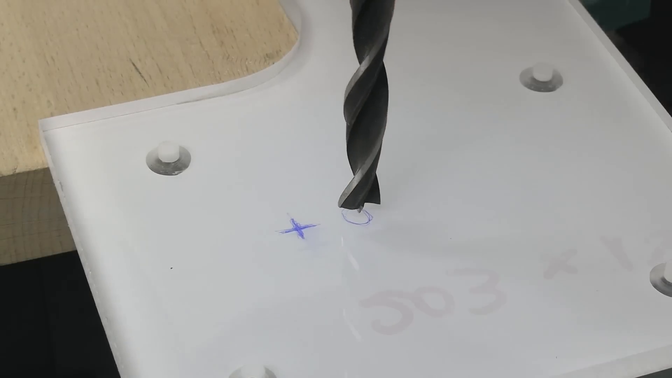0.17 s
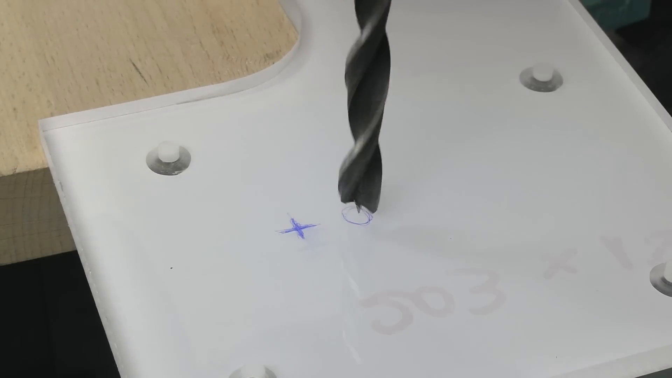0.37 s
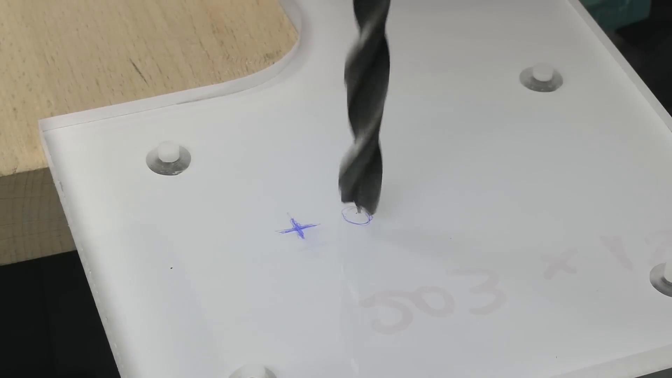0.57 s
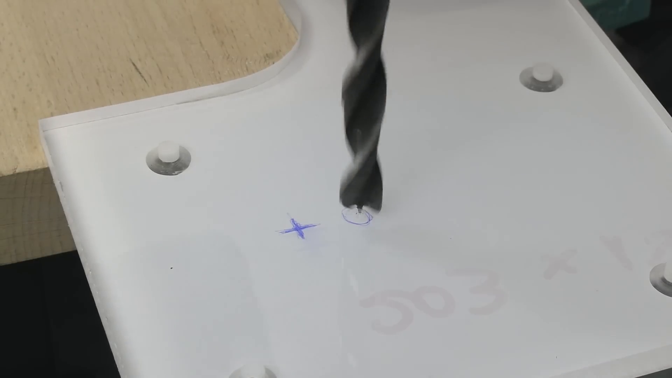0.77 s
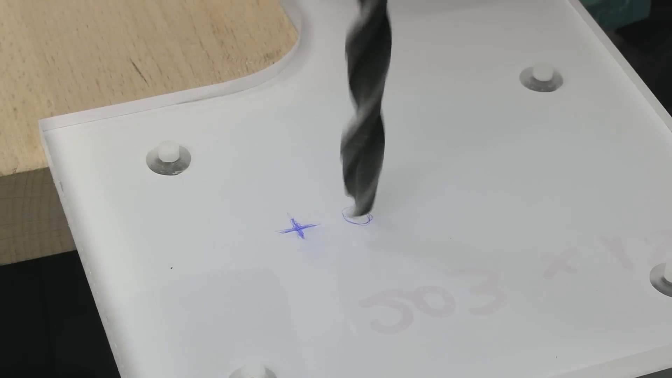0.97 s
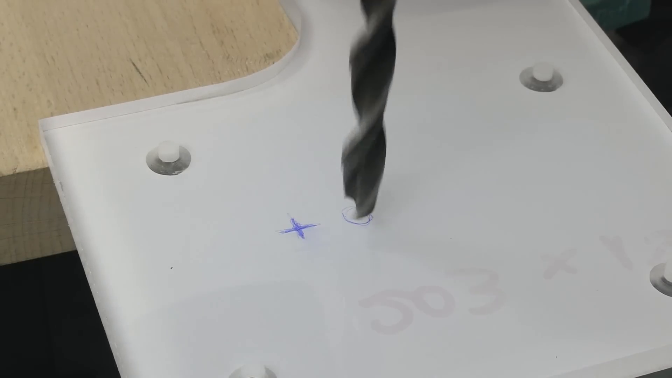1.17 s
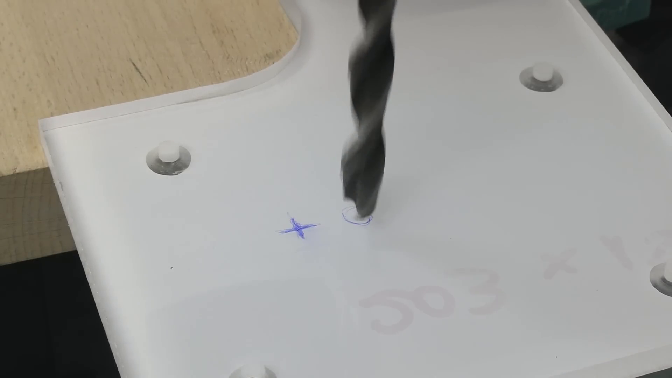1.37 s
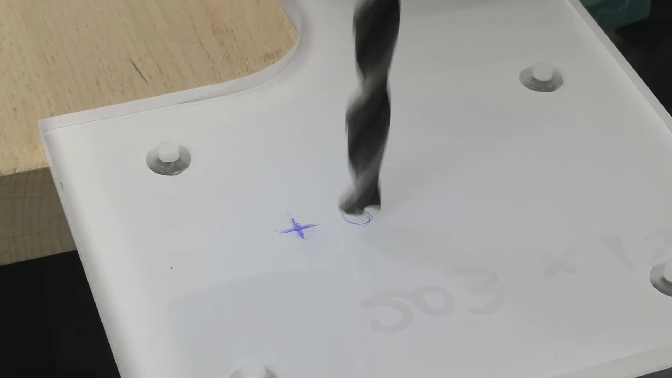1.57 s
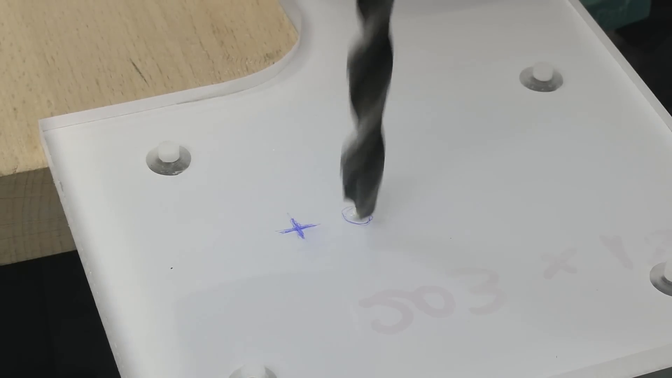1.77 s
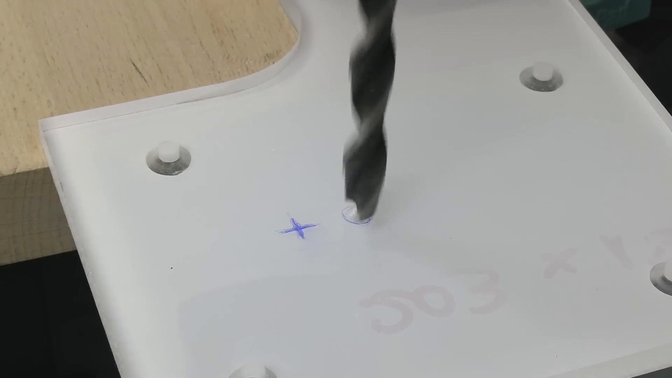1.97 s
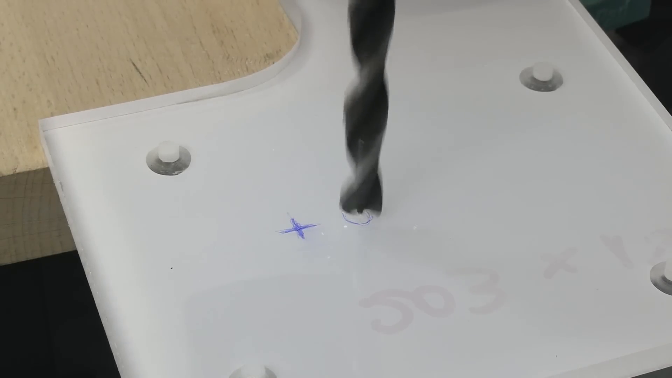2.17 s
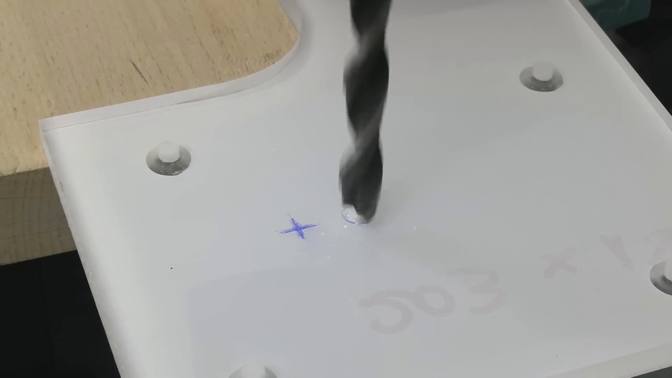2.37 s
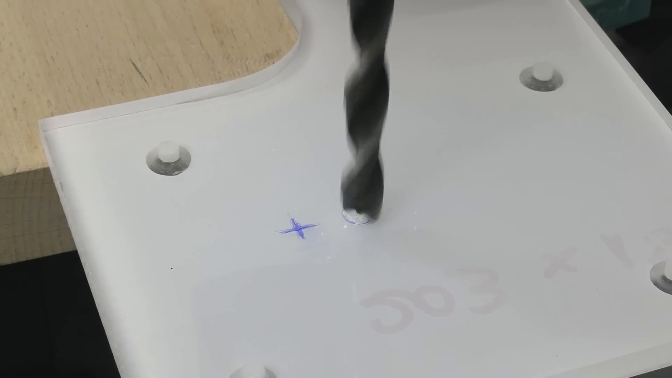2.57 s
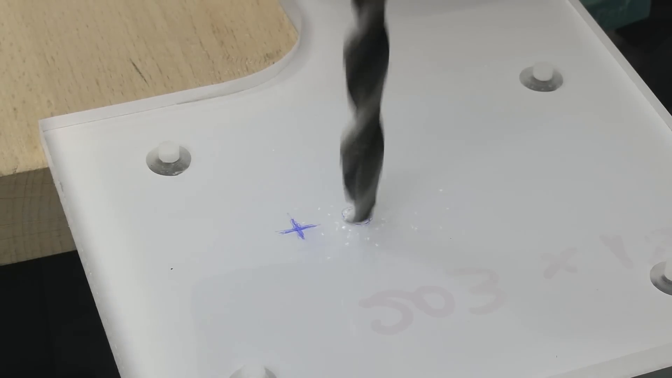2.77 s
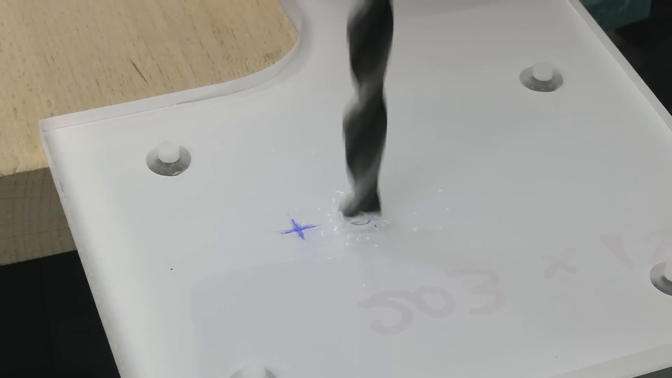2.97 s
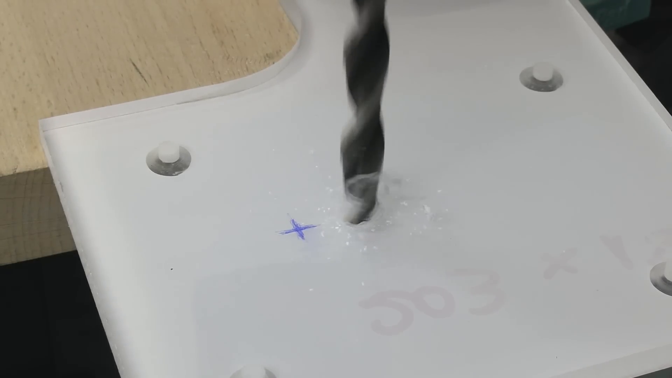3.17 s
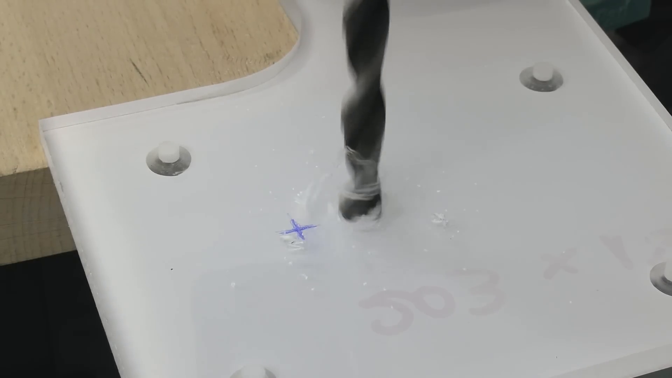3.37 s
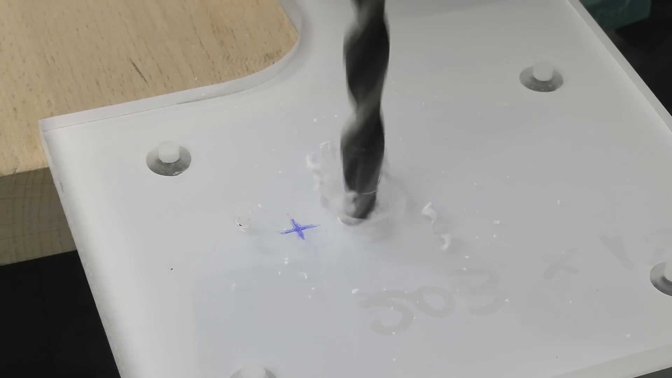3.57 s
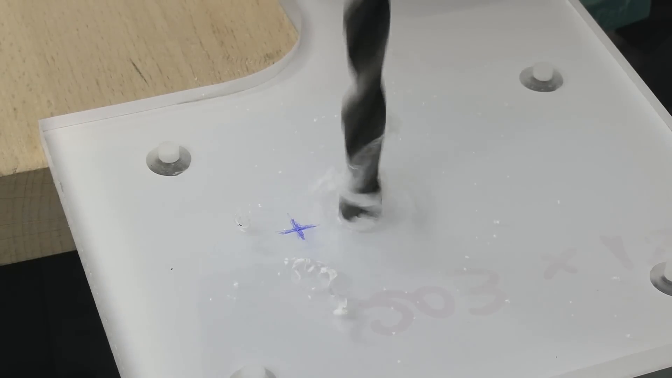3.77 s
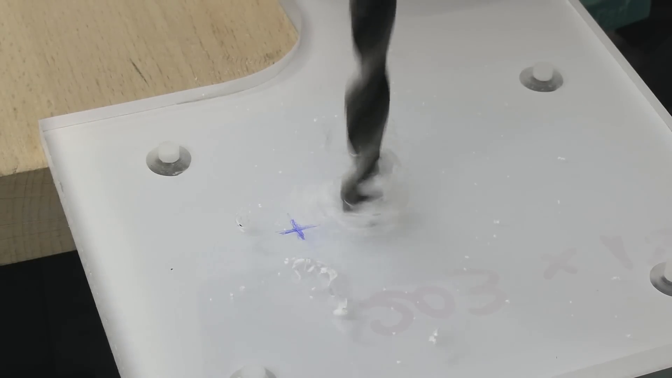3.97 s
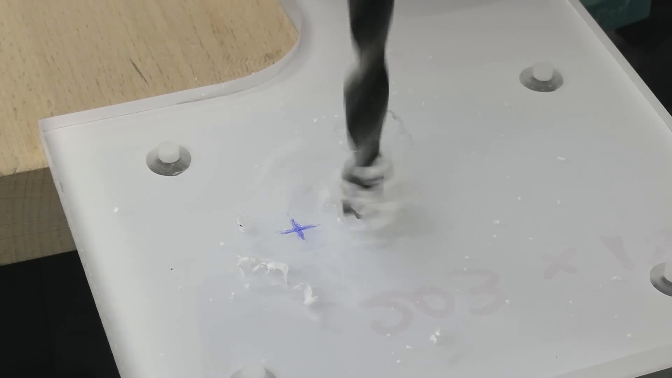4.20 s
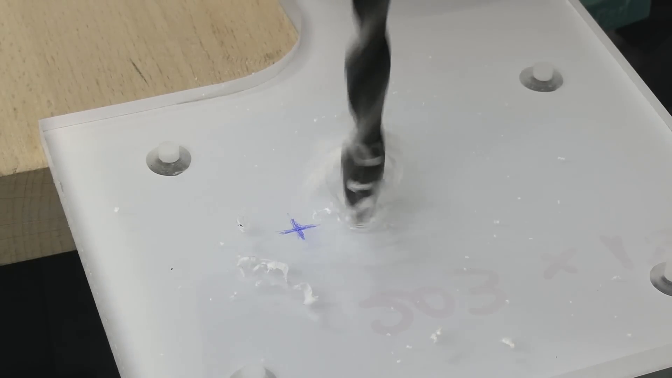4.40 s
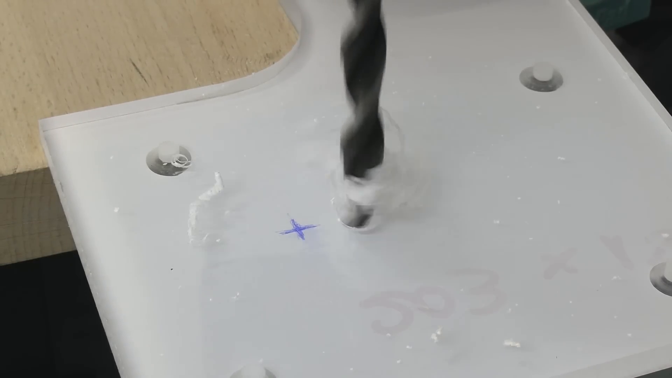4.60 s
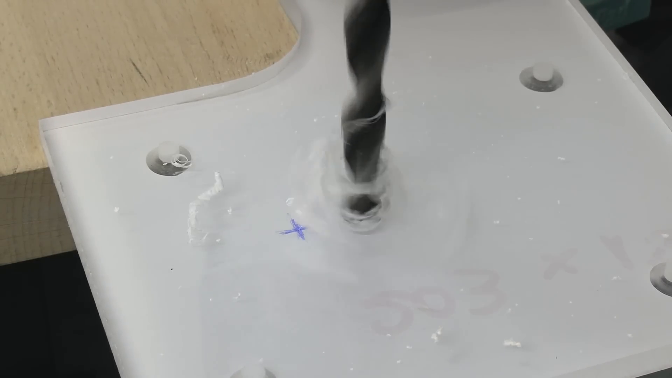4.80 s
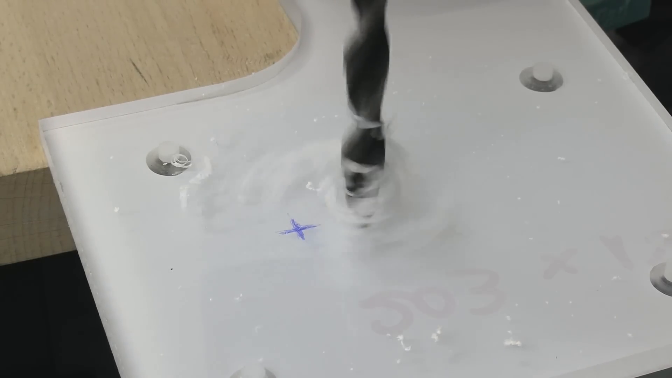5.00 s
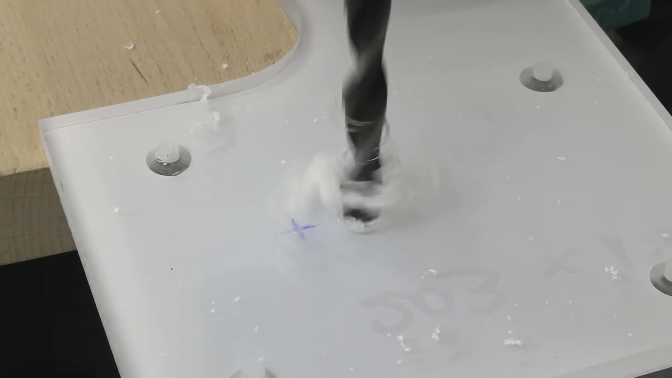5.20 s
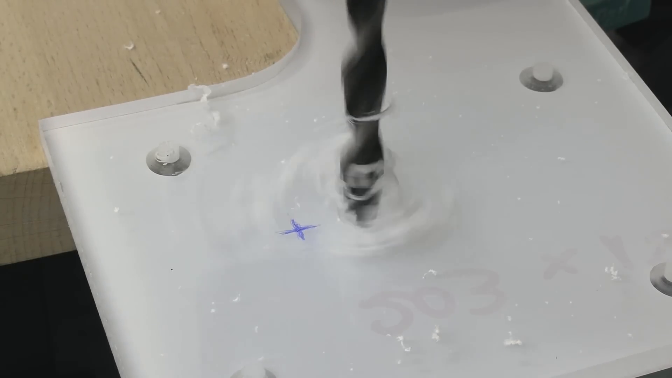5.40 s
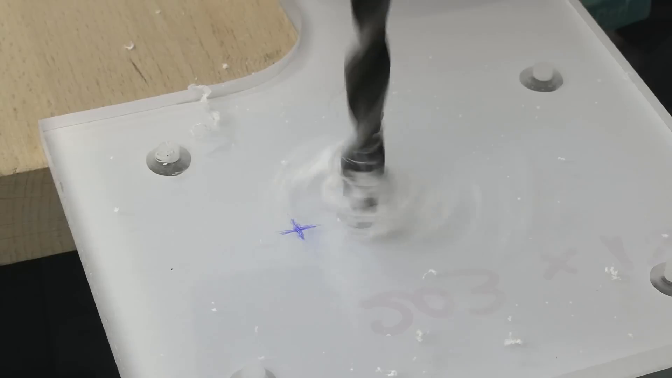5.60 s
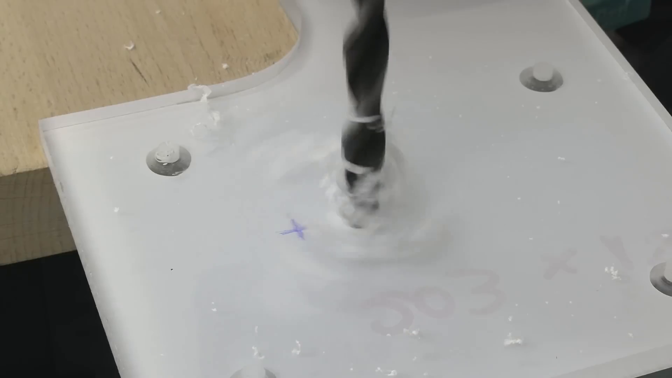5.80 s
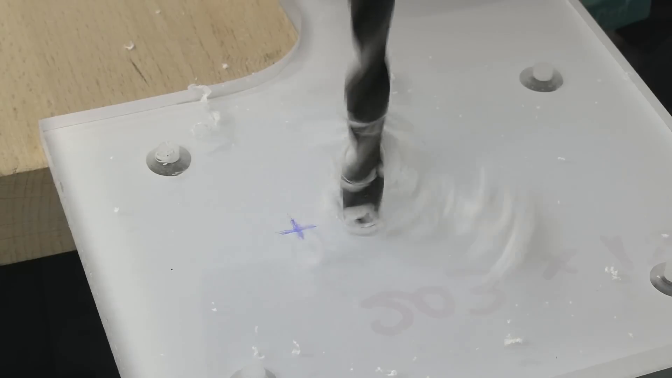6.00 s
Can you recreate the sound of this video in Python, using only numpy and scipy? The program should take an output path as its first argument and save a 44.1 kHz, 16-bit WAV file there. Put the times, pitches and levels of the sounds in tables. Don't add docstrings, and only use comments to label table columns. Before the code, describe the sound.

In a quiet workshop, a drill's trigger clicks and a dull knock starts the motor. Its whine climbs in uneven steps to a bright, hissy full speed with soft air puffs. Abruptly the sound is nearer; the bit bites plastic, short high squeaks chirp out, and the tone sags and growls with small bumps until the end. Close stereo microphone, little room.

```python
import sys
import numpy as np
from scipy import signal
from scipy.fft import rfft, irfft, next_fast_len
from scipy.io import wavfile
from scipy.ndimage import uniform_filter1d, map_coordinates

SR = 44100
rng = np.random.default_rng(int(sys.argv[2]) if len(sys.argv) > 2 else 0)


def level_to_linear(level):
    exponent = np.asarray(level, float) / 20
    return 10 ** exponent


def wav_out(sig):
    wavfile.write(sys.argv[1], SR, np.round(np.clip(np.atleast_2d(sig).T, -1, 1) * 32767).astype(np.int16))


N = 266805

ON_S, FREE_S = .412, .767
FULL_S, SCENE_S = 1.52, 2.075
BITE_S, HUM_S = 2.33, 2.765
POLES = 3


def unit(x):
    return x / np.sqrt(np.mean(x ** 2) + 1e-20)


def along(points, hz):
    f, v = np.transpose(points)
    return np.interp(np.log(hz + 1), np.log(f + 1), v)


def curves(rows):
    s, *cols = np.transpose(rows)
    t = np.arange(N) / SR
    gate = uniform_filter1d(1. * ((t > s[0]) & (t <= s[-1])), size=150)
    return [gate] + [np.interp(t, s, c) for c in cols]


def between(s0, s1):
    return curves([(s0,), (s1,)])[0]


def wobble(rate, size=N):
    coarse = np.arange(0, size + 8, 8)
    knots = rng.standard_normal(int(size * rate / SR) + 4)
    curve = map_coordinates(knots, [coarse * rate / SR])
    return np.interp(np.arange(size), coarse, curve)


def filtered(x, response):
    m = next_fast_len(N + 8192)
    return irfft(rfft(x, m) * response(np.fft.rfftfreq(m, 1 / SR)), m)[..., :N]


def rush(spectrum, wide, lumps):
    colour = lambda hz: level_to_linear(along(spectrum, hz) + [0 * hz, along(wide, hz)])
    mid, side = filtered(lumps * rng.standard_normal((2, N)), colour)
    return unit(np.array([mid + side, mid - side]))


def add(x, s, sound):
    part = x[round(s * SR):][:len(sound)]
    part += sound[:len(part)]


def drill():
    t, (speed, deep) = np.arange(N) / SR, shaft()
    return starting(t, speed) + running(speed) + boring(t, speed, deep)


# (time [s], shaft speed aimed at [turns/s], lag [s])
STEPS = [(.405, 84, .034), (.5, 87.6, .068), (.607, 110, .05), (.625, 154, .052), (.764, 155.5, .003),
         (.772, 183.6, .115), (1.296, 205, .05), (1.318, 235.3, .031), (1.455, 256.1, .02),
         (2.09, 255.3, .1), (2.311, 265.6, .014)]
# (time [s], speed lost [turns/s])
SAG = [
    (2.6, 0),
    (2.9, .8),
    (3.32, 2.9),
    (4, 3.6),
    (4.28, 4.5),
    (4.52, 4.1),
    (5.24, 6),
    (5.72, 7.1),
    (6.05, 6.1),
]


def shaft():
    t, speed = np.arange(N) / SR, np.zeros(N)
    for s, aim, lag in STEPS:
        climb = aim + (speed[int(s * SR)] - aim) * np.exp(-np.abs(t - s) / lag)
        speed = np.where(t >= s, climb, speed)
    sag = curves(SAG)[1]
    nearly_full_sag = 4.5
    return uniform_filter1d(speed, size=300) - sag, np.tanh(sag / nearly_full_sag)


def poled(order):
    return POLES * round(order / POLES)


def whine(gate, speed, levels, casing, drift_hz, flutter_db, smear, skew, surge_db=0, flutter_hz=35):
    on = gate > 0
    surge = np.tanh(np.abs(np.gradient(speed)) * SR / 700)[on]
    speed = (speed + drift_hz * wobble(13))[on]
    turns, out = np.cumsum(speed) / SR, np.zeros((2, N))
    for order, db in levels:
        lift_db = sum(g / (1 + (2 * (order * speed - hz) / w) ** 2) for hz, w, g in casing)
        phase = 2 * np.pi * order * turns + smear * np.sqrt(order) * wobble(70, size=len(turns))
        blur_db = surge_db * surge * (order > 10)
        flutter = flutter_db * wobble(flutter_hz, size=len(turns))
        level_db = (db + np.zeros(N))[on] + lift_db - blur_db + flutter
        size = np.sqrt(2) * gate[on] * level_to_linear(level_db)
        out[:, on] = out[:, on] + size * np.sin(phase + np.array([[-skew], [skew]]) * order)
    return out


def brushes(gate, hiss_db, casing_db, top_db, spectrum, wide, ripple, sparks_db):
    beat = np.cos(2 * np.pi * 310 * np.arange(N) / SR + 3.5 * wobble(16))
    lumps = (1 + ripple * beat) * level_to_linear(sparks_db * wobble(900) + 0.51 * wobble(12))
    hiss = rush(spectrum, wide, lumps)
    low_pass = lambda hz: 1 / (1 + (hz / 2800) ** 4)
    high_pass = lambda hz: 1 - 1 / (1 + (hz / 11500) ** 6)
    casing, top = filtered(hiss, lambda hz: np.array([[low_pass(hz)], [high_pass(hz)]]))
    return gate * level_to_linear(hiss_db) * (hiss + (level_to_linear(casing_db) - 1) * casing + (level_to_linear(top_db) - 1) * top)


# (shaft order, level when slow [dB], level when fast [dB])
START_ORDERS = [(3, -97, -71.5), (5.9, -85, -61), (8.99, -53, -35.5), (12.26, -86, -58.5),
                (17.8, -53.5, -44), (27, -53, -49.5), (30, -73, -56), (36.1, -66, -52), (45, -81, -49),
                (52.4, -65, -49), (63, -58, -54), (72, -67.5, -43), (80.5, -65, -58), (90, -66, -55)]
# (frequency [Hz], width [Hz], lift [dB])
START_CASING = [(567, 88, -10), (1280, 280, -4), (1380, 100, 3.5), (1800, 150, 9.5), (2000, 200, -5),
                (2260, 75, 6), (2680, 180, 6.5), (3770, 650, 14.5)]
# (frequency [Hz], density [dB per Hz])
START_HISS = [(180, -51), (300, -50), (600, -16.5), (1000, -8), (2200, -2.5), (4700, 2), (6000, -3),
              (7200, -5), (10200, -2), (15700, -11.5)]
# (frequency [Hz], side minus mid [dB])
WIDE_FREE = [(60, -26), (130, -11), (290, -25), (640, -26), (1000, -25), (1410, -34), (3100, -8.5),
             (6820, -10), (15000, -16)]


def starting(t, speed):
    fast = np.clip((speed - 80) / 68, -1.2, 1.05)
    levels = [(poled(order), slow_db + (fast_db - slow_db) * fast)
              for order, slow_db, fast_db in START_ORDERS]
    on = between(ON_S, FREE_S)
    fade_in = np.clip((t - .43) / .035, 0, 1)
    tones = whine(on * fade_in, speed, levels, START_CASING, drift_hz=0.072, flutter_db=3.5,
                  smear=0.024, skew=0.0071, surge_db=6.5)
    shudder_db = 0.62 + 8 * np.exp(-np.abs(t - ON_S) / 0.052)
    return tones + brushes(on, -43.5 + 8.4 * fast, shudder_db, -.5 - .5 * fast, START_HISS, WIDE_FREE,
                           ripple=0.039, sparks_db=0.8)


# (shaft order, level when slow [dB], level when fast [dB], gain at held speed [dB])
FREE_ORDERS = [(3, -63, -62, -11), (6, -57.5, -65, -2), (9, -49, -47, 5), (12, -50, -61, -5),
               (18, -61, -65, 0), (27, -53, -52, 0), (36, -45, -43, 1), (45, -60, -46, 2),
               (54, -45.5, -49.5, 0), (60, -56, -55, 2), (63, -55, -64, 0), (72, -50, -78, 0),
               (84, -53, -78, 0)]
# (shaft order, level [dB])
SPIN_FAINT = [(15, -60), (69, -66), (81, -64), (90, -56)]
# (frequency [Hz], width [Hz], lift [dB])
FREE_CASING = [(1434, 120, 10), (1890, 130, 6), (2060, 260, -15), (4580, 410, 11), (5450, 440, -2),
               (2730, 470, 8), (6340, 180, -14), (7900, 860, 9.5), (8300, 480, -20), (9400, 290, 8),
               (10400, 300, 4.5), (11800, 540, -12), (12550, 200, 4)]
# (frequency [Hz], density [dB per Hz])
FREE_HISS = [(180, -56), (300, -40), (432, -40), (746, -17), (910, -17.5), (1330, -13.5), (1820, -5.5),
             (3050, -7), (4310, -1), (5260, -6), (6210, -1.5), (7210, -7), (11100, -4.5), (14700, -11),
             (15700, -7)]
# (time [s], level [dB])
EFFORT = [
    (.767, -1.5),
    (.95, 1.3),
    (1.28, -2),
    (1.34, 0),
    (1.5, 1.5),
    (1.7, 1),
    (2.075, 0.5),
]


def running(speed):
    on, effort_db = between(FREE_S, SCENE_S), curves(EFFORT)[1]
    fast = np.clip((speed - 182) / 72, 0, 1)
    held = np.clip((np.arange(N) / SR - FULL_S) / (SCENE_S - FULL_S), 0, 1)
    levels = [(poled(order), slow_db + (fast_db - slow_db) * fast + 1.14 * effort_db + held_db * held)
              for order, slow_db, fast_db, held_db in FREE_ORDERS]
    faint = [(poled(order), db) for order, db in SPIN_FAINT]
    tones = whine(on, speed, levels, FREE_CASING, drift_hz=0.1, flutter_db=0.64,
                  smear=0.025, skew=0.0064, surge_db=-2.5)
    tones += whine(on, speed, faint, [], drift_hz=0.085, flutter_db=6.5, smear=0.044, skew=0.0036)
    fan_db = -3.5 + 3.7 * np.clip((speed - 155) / 100, 0, 1)
    return tones + brushes(on, -34.0 + effort_db, .1, fan_db, FREE_HISS, WIDE_FREE,
                           ripple=0.044, sparks_db=0.1)


# (shaft order, level shallow [dB], level deep [dB], gain before the bite [dB])
BORE_ORDERS = [(2.995, -76.5, -67, 9), (6, -54, -46, -15), (9, -67, -69, 1.5), (12, -59.5, -58.5, -2),
               (18, -46.5, -45, 3), (24, -54.5, -58.5, -4), (30, -54, -76, 1), (36, -52.5, -49.5, -2),
               (54, -50, -66, -8), (60, -57, -48, -4)]
# (shaft order, level shallow [dB], level deep [dB])
GEARS = [(5.07, -76, -61.5), (14, -59, -55), (16.4, -64, -51), (16.8, -56, -47.5), (33.6, -54, -54),
         (37.9, -58, -62), (49.4, -53, -53), (52.1, -64, -53), (56, -60, -48)]
# (frequency [Hz], density [dB per Hz])
LOADED_HISS = [(180, -72), (300, -31), (900, -27), (1400, -14), (1700, -11), (1830, -15), (1960, -12.5),
               (2150, -11), (2950, -10), (3500, -2.5), (4100, -2.5), (4360, 2.5), (4600, -4), (5010, -4.5),
               (8650, 1.5), (9050, -0.5), (9400, 1.5), (9800, -3), (10400, -2.5), (12000, 1), (15700, -2.5)]
# (frequency [Hz], side minus mid [dB])
WIDE_LOADED = [(60, -26), (130, -16), (290, -16), (640, -33), (1410, -31), (3100, -23), (6820, -8),
               (15000, -10)]


def boring(t, speed, deep):
    on, cut = between(SCENE_S, 7), deep ** 1.6
    loose = 1 / (1 + np.exp(np.clip((t - BITE_S) / 0.051, -30, 30)))
    no_hum = 1 - between(HUM_S, 7)
    motor = [(poled(order), a_db + (b_db - a_db) * cut + c_db * loose - 16 * (order < POLES + 1) * no_hum)
             for order, a_db, b_db, c_db in BORE_ORDERS]
    gears = [(order, a_db + (b_db - a_db) * cut) for order, a_db, b_db in GEARS]
    tones = whine(on, speed, motor, [], drift_hz=0.268, flutter_db=1.38, smear=0.12, skew=0.0041,
                  flutter_hz=74.7)
    tones += whine(on, speed, gears, [], drift_hz=0.287, flutter_db=2.0, smear=0.17, skew=0.0037)
    since_grab = t - 3.295
    throb_db = 1.2 * np.cos(2 * np.pi * 13 * since_grab) * np.exp(-(since_grab / .3) ** 2)
    return tones + brushes(on, -35.3 + 3.58 * deep + throb_db, -1.6 + 3.2 * deep, .1,
                           LOADED_HISS, WIDE_LOADED, ripple=0.058, sparks_db=0.4)


# (time [s], peak level [dB], frequency [Hz], length [s])
SQUEAKS = [(3.031, -31.5, 10200, 0.0064), (3.034, -33, 9300, 0.0082), (3.082, -33, 9600, .005),
           (3.085, -31, 9300, 0.0051), (3.088, -31, 10200, 0.0056), (3.131, -30, 9900, 0.0055),
           (3.14, -27, 9400, 0.0077), (3.166, -36, 10400, .008), (3.206, -30.5, 9700, 0.0104),
           (3.216, -28, 9400, 0.0034), (3.281, -29, 9620, 0.015), (3.293, -33, 10300, 0.015),
           (3.313, -31, 10300, 0.009), (3.355, -32.5, 9600, 0.016), (3.369, -36, 10300, .01),
           (3.377, -31, 10400, .007), (3.457, -36, 10400, 0.011), (3.495, -35, 10000, 0.0084),
           (3.512, -35, 9400, 0.0146), (3.596, -33, 10400, 0.0091), (3.601, -32.5, 9700, 0.01),
           (3.892, -36, 6400, 0.017), (4.046, -34.5, 6300, 0.017), (4.204, -37, 5570, 0.0097),
           (4.311, -35, 8800, 0.0087), (4.346, -33.5, 7000, 0.011), (4.374, -38, 6600, .01)]


def squeaks():
    x = np.zeros(N)
    for s, db, hz, length in SQUEAKS:
        u = np.arange(int(length * SR)) / (length * SR)
        band = signal.butter(2, [0.95 * hz, 1.08 * hz], "bandpass", fs=SR, output="sos")
        scrape = signal.sosfilt(band, rng.standard_normal(len(u)))
        chirp = np.sin(2 * np.pi * hz * length * (1.06 * u - 0.059 * u ** 2))
        add(x, s, level_to_linear(db) * np.sin(np.pi * u) * (0.87 * chirp + 2.46 * scrape))
    return x


# (time [s], peak level [dB], brightness [dB])
TICKS = [(0.01, -22, -7), (0.193, -42.5, -17), (0.2194, -53, -20), (0.2314, -64, -9), (0.2525, -45.5, -14),
         (0.27, -45, -23), (0.293, -52, -20), (0.3124, -54, -19), (0.321, -55, -20), (0.3665, -51, -10),
         (0.4037, -42, -8), (0.4118, -40, -1)]
# (frequency [Hz], level [dB], t60 [s])
SHELL = [(2160, -2.5, 0.0017), (2780, 3.5, 0.0037), (3480, -7, 0.0025), (5600, 12.5, 0.0035),
         (8800, 9, 0.0024), (11900, 10, 0.002)]


def ticks():
    x, t = np.zeros(N), np.arange(600) / SR
    for s, db, bright_db in TICKS:
        for hz, level_db, t60 in SHELL:
            strength_db = db - 6 + level_db + (hz > 4500) * bright_db + rng.normal(0, 2.1)
            ring = level_to_linear(strength_db - 60 * t / t60) * np.sin(2 * np.pi * hz * t)
            add(x, s, ring * (1 - np.exp(-t / 0.000096)))
    return filtered(x, lambda hz: 1 / (1 + (1100 / (hz + 1)) ** 3))


# (time [s], level [dB], t60 [s], upper modes [dB])
KNOCKS = [
    (.0105, -27, 0.1, -13),
    (0.4126, -18, 0.022, -8),
    (0.798, 4.5, 0.022, 1),
    (.81, -5, 0.057, -10),
]


def knock():
    x, t = np.zeros(N), np.arange(4000) / SR
    body = [(330, -47), (560, -42), (690, -34.5), (860, -35.5), (1020, -45), (1250, -42), (1900, -32.5)]
    for s, level_db, t60, upper_db in KNOCKS:
        ring = sum(level_to_linear(db + (hz > 1500) * upper_db) * np.sin(2 * np.pi * hz * rng.normal(1, .03) * t)
                   for hz, db in body)
        add(x, s, ring * level_to_linear(level_db - 60 * t / t60) * (1 - np.exp(-t / 0.0012)))
    return filtered(x, lambda hz: 1 / (1 + (330 / (hz + 1)) ** 6))


# (time [s], peak level [dB], frequency [Hz])
PUFFS = [(1.379, -56, 258), (1.422, -54, 291), (1.456, -64, 700), (1.493, -52, 328), (1.54, -55, 247),
         (1.61, -53, 337), (1.643, -55, 404), (1.779, -56, 326), (1.877, -49, 350), (2.044, -51.5, 417),
         (1.027, -66, 200), (1.114, -59, 245),
         (2.095, -51, 474), (2.227, -58, 748), (2.252, -55, 525), (2.313, -57, 528), (2.34, -57, 460),
         (2.449, -61, 396), (2.554, -59, 538), (2.64, -66, 390), (2.724, -55, 444), (2.756, -56.5, 624),
         (2.827, -64, 560), (3.003, -59, 409), (3.068, -65, 468), (3.168, -76, 748), (3.176, -66, 533),
         (3.33, -69, 342), (3.441, -71, 748), (3.527, -68, 501), (3.562, -75, 600), (3.758, -62, 393),
         (3.905, -55, 630), (4.069, -57, 622), (4.112, -54, 552), (4.145, -62, 506), (4.219, -49, 732),
         (4.27, -62, 748), (4.3, -58, 406), (4.33, -64, 541), (4.378, -72, 748), (4.4, -74, 576),
         (4.497, -66, 304), (4.625, -72, 748), (4.691, -59, 546), (4.732, -54.5, 479), (4.769, -64, 557),
         (4.851, -65, 748), (5.006, -51.5, 482), (5.085, -48.5, 594), (5.129, -61, 614), (5.171, -64, 355),
         (5.275, -61, 557), (5.436, -58, 525), (5.484, -56, 665), (5.635, -45.5, 549), (5.717, -56, 404),
         (5.789, -62, 514), (5.836, -63, 748), (5.88, -67, 627), (5.913, -50, 450), (5.945, -58, 345)]


def puffs():
    x = np.zeros((2, N))
    turn, lean = .7, .2
    for s, db, hz in PUFFS:
        cycles = np.arange(int(2.6 * SR / hz)) * hz / SR
        size = level_to_linear(db + 2.0) * np.sin(np.pi * cycles / 2.6) ** 2
        push = size * np.sin(2 * np.pi * cycles)
        late = size * np.cos(2 * np.pi * cycles)
        add(x[0], s, push * (1 + lean) + turn * late)
        add(x[1], s, push * (1 - lean) - turn * late)
    return x


# (time [s], level [dB])
GUSTS = [(.42, -90), (.9, -74.5), (1.1, -71), (1.27, -68), (1.4, -60), (2.08, -60.5), (2.15, -65),
         (2.3, -75), (2.5, -76), (2.8, -77.5), (3.5, -86), (4.3, -79), (6.05, -76)]
# (frequency [Hz], density [dB per Hz])
AIR = [(25, -17), (60, -16), (120, -8), (250, 0.5), (500, -5.5), (800, -5), (1200, -24.5)]
# (frequency [Hz], side minus mid [dB])
WIDE_AIR = [(60, -30), (90, -26), (140, -14), (250, -16), (500, -23), (900, -13)]


def air():
    gate, gust_db = curves(GUSTS)
    lumps = level_to_linear(3.0 * wobble(45) + 3.7 * wobble(15) + 0.78 * wobble(2.53))
    return gate * level_to_linear(gust_db) * rush(AIR, WIDE_AIR, lumps)


# (frequency [Hz], t60 [s])
SHOP = [(300, 0.11), (3000, 0.2), (12000, 0.13)]


def shop(x):
    hz, t, z = signal.stft(rng.standard_normal((2, SR // 3)), SR, nperseg=256)
    decay = level_to_linear(-60 * t / along(SHOP, hz)[:, None])
    tail = signal.istft(z * decay, SR, nperseg=256)[1]
    return signal.fftconvolve(x[None], tail / np.linalg.norm(tail[0]), axes=1)[:, :N]


# (frequency [Hz], density [dB per Hz])
QUIET = [(25, -24), (100, -17), (160, -17), (400, -12), (635, -9), (2020, -11), (2800, -12), (6000, -15),
         (15700, -20.5)]


def floor():
    return level_to_linear(-73.5) * rush(QUIET, WIDE_LOADED, 1)


def scene():
    clicks, edge = ticks() + knock(), squeaks()
    room = level_to_linear(-7.5) * shop(clicks + level_to_linear(1.5) * edge)
    return drill() + air() + clicks + edge + room + puffs() + floor()


# (lower edge [Hz], upper edge [Hz])
NARROW_HZ = (1745, 1885)
# (time [s], length [s])
GAPS = [(2.35, .12), (2.51, .19), (2.745, .03), (2.81, .055), (2.94, .03), (3.02, .04), (3.135, .04),
        (3.2, .06), (3.345, .035), (3.48, .11), (3.63, .05), (3.97, .03), (4.13, .125), (4.3, .075),
        (4.57, .11), (4.715, .055), (4.88, .1), (5.02, .04), (5.11, .035), (5.175, .025), (5.225, .035),
        (5.34, .04), (5.475, .025), (5.55, .045), (5.8, .04), (5.87, .025)]


def gapped(x):
    shut = sum(between(s, s + length) for s, length in GAPS)
    band = filtered(x, lambda hz: (hz > NARROW_HZ[0]) & (hz < NARROW_HZ[1]))
    return x - uniform_filter1d(shut, size=300) * band


def band_limit(x):
    return signal.sosfilt(signal.butter(12, 17030, fs=SR, output="sos"), x)


# (frequency [Hz], left minus right [dB])
LEAN = [(60, 0.0), (150, -1), (380, -1), (950, -0.5), (2380, -0.5), (5980, -1.0), (15000, -1.5)]


def record(dry):
    top_hz = 15725
    ports = filtered(dry, lambda hz: level_to_linear(np.outer([.5, -.5], along(LEAN, hz))) * (hz < top_hz))
    return band_limit(gapped(ports))


dry = scene()
out = record(dry)
wav_out(out)
```